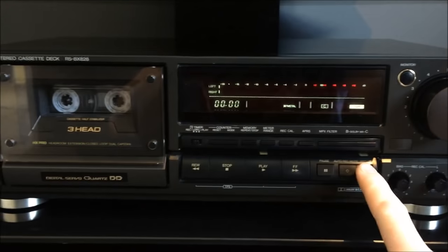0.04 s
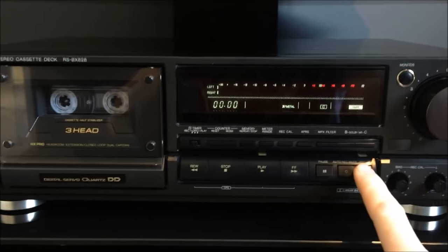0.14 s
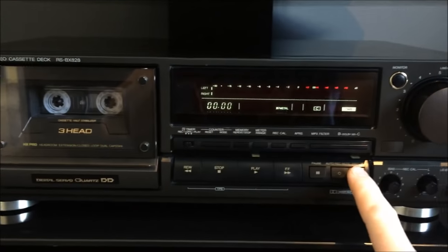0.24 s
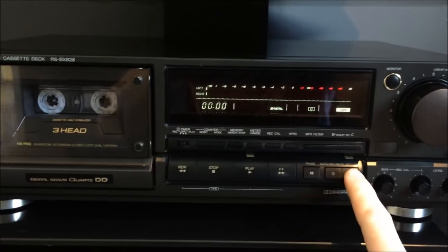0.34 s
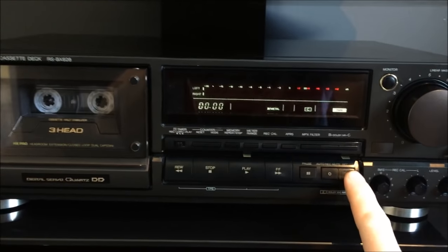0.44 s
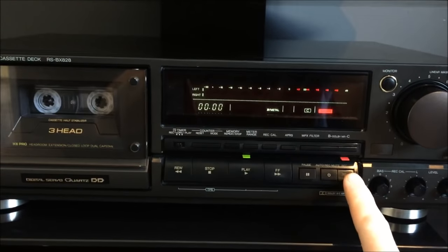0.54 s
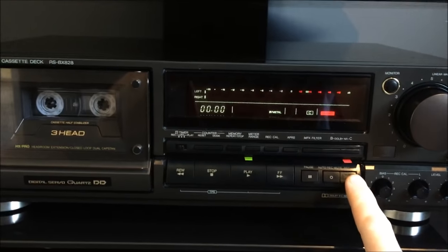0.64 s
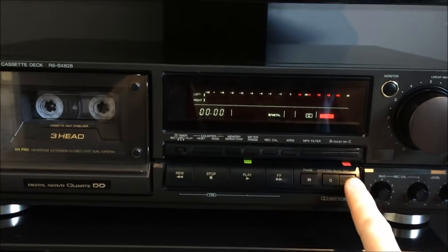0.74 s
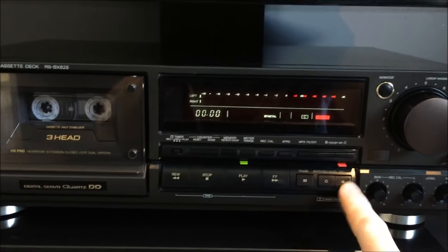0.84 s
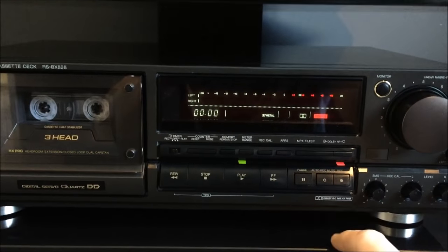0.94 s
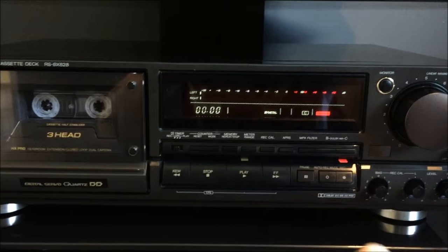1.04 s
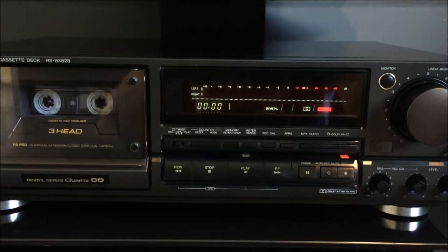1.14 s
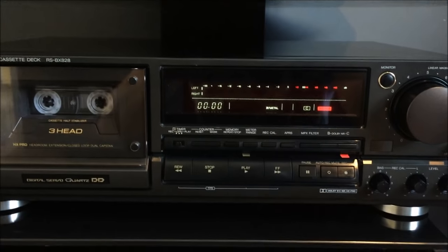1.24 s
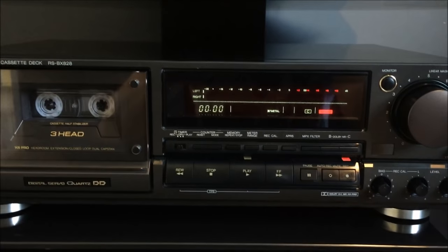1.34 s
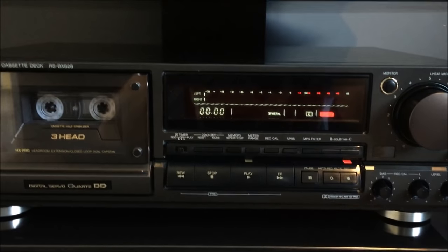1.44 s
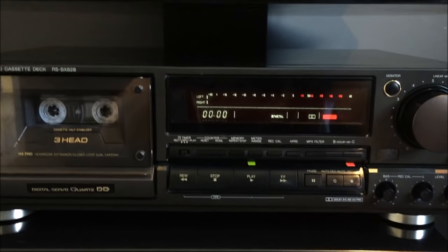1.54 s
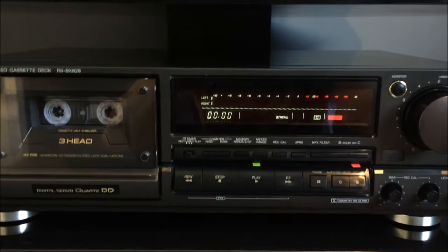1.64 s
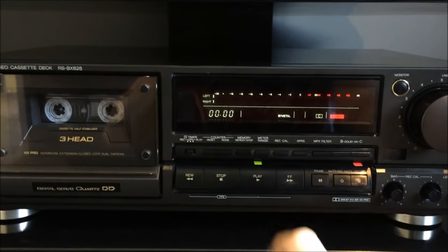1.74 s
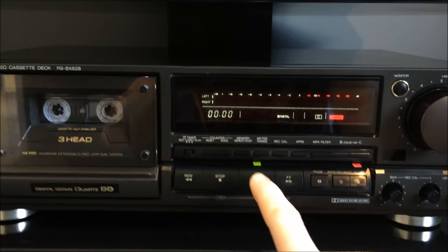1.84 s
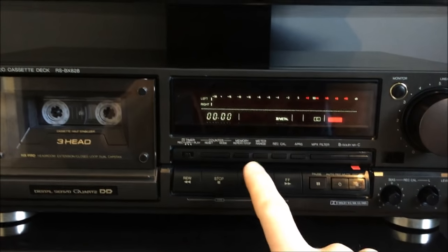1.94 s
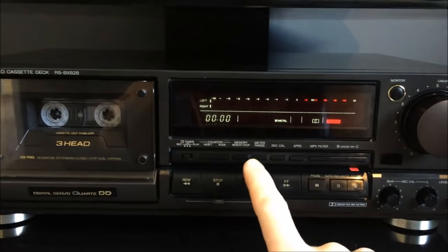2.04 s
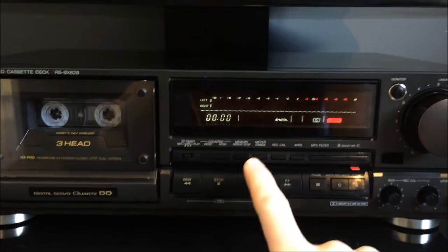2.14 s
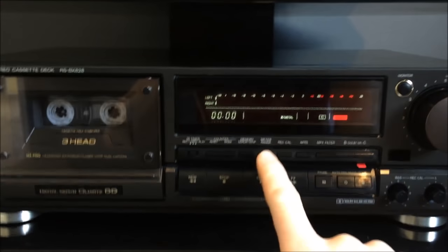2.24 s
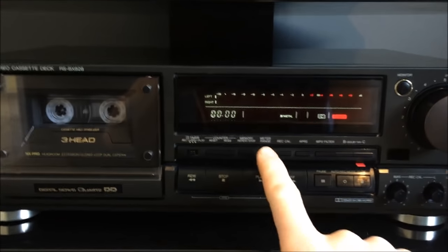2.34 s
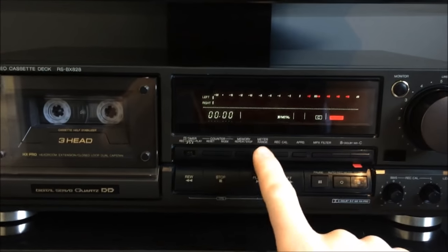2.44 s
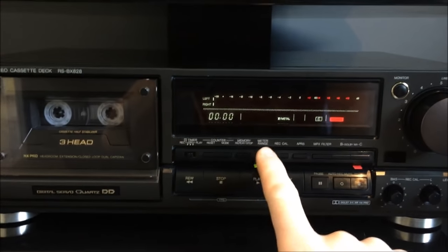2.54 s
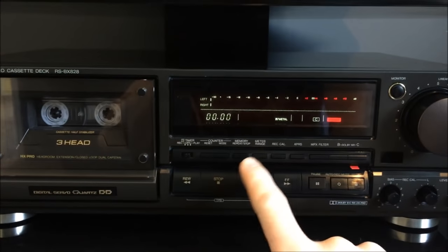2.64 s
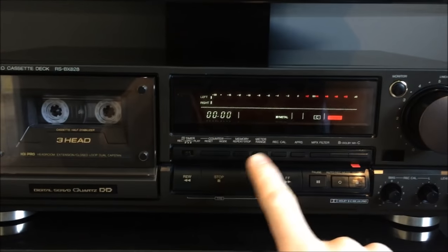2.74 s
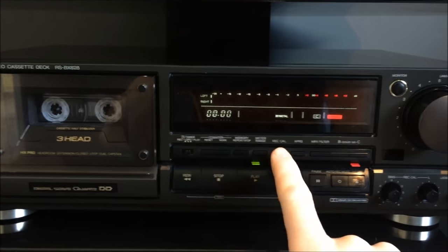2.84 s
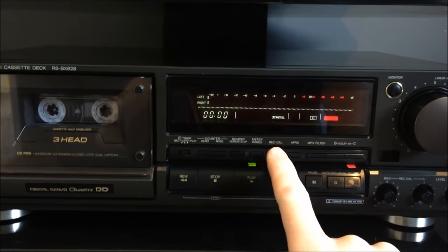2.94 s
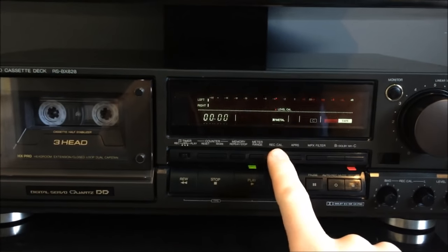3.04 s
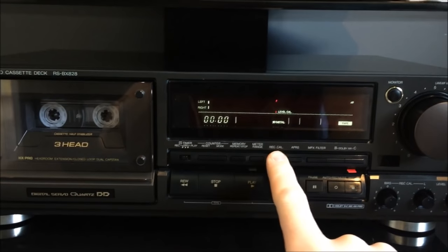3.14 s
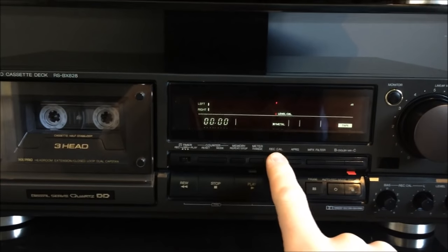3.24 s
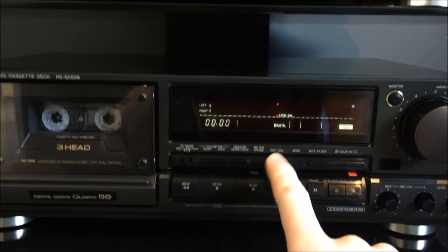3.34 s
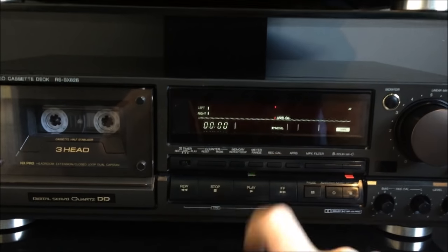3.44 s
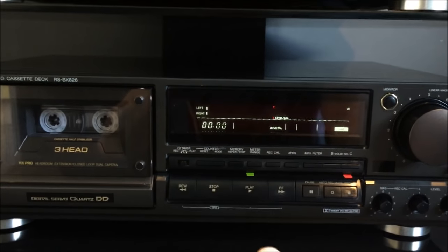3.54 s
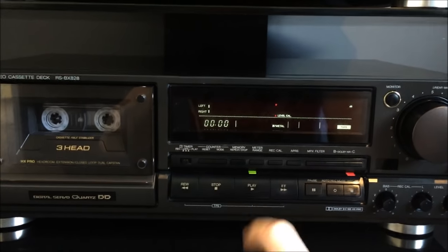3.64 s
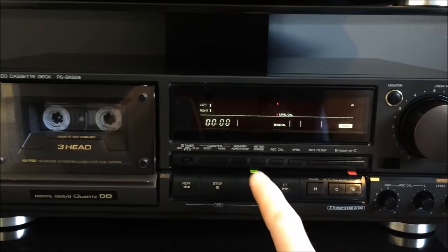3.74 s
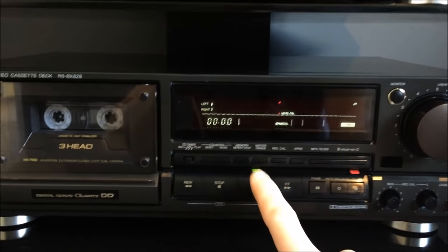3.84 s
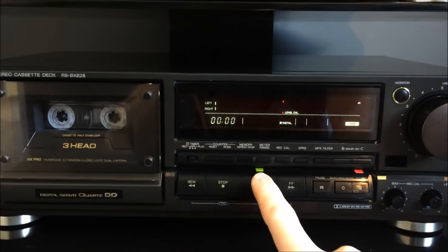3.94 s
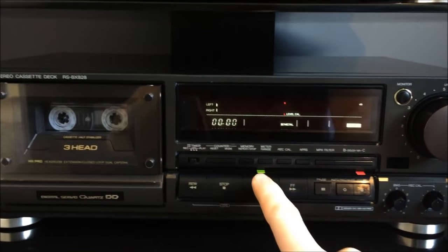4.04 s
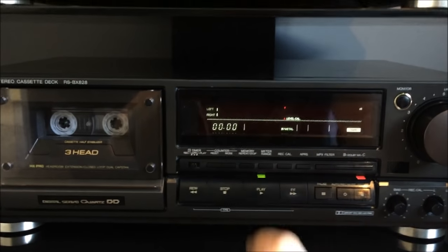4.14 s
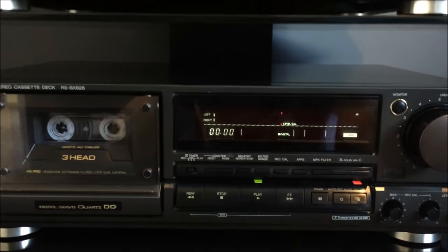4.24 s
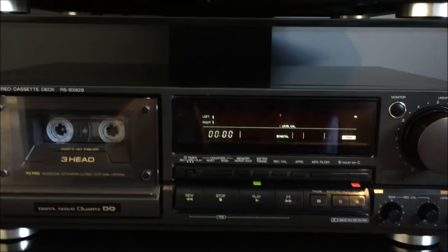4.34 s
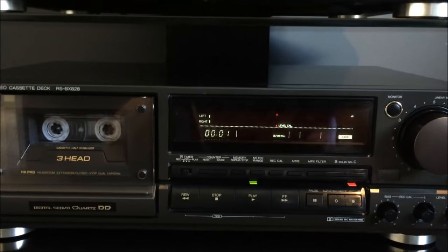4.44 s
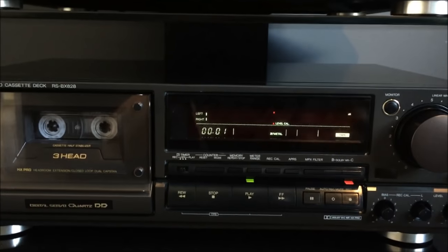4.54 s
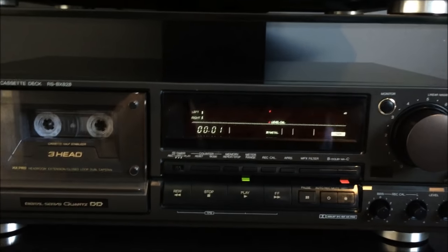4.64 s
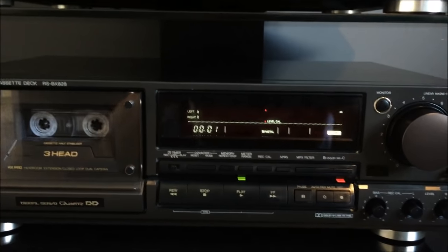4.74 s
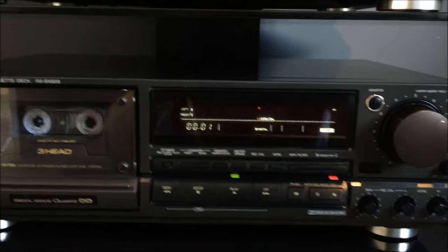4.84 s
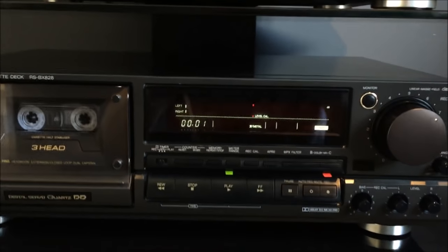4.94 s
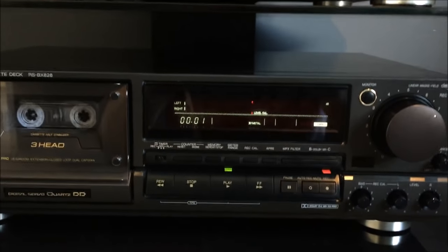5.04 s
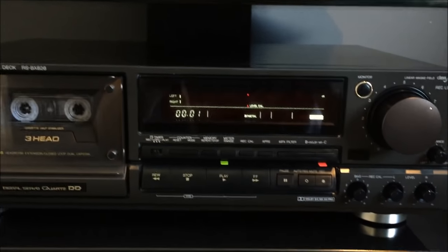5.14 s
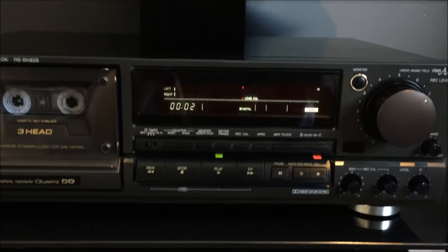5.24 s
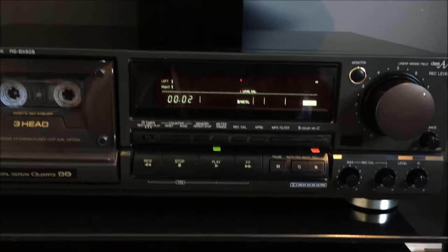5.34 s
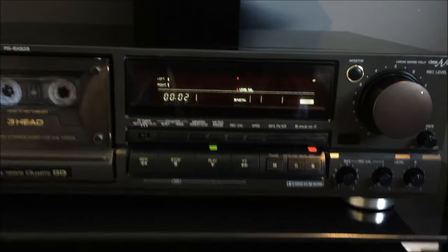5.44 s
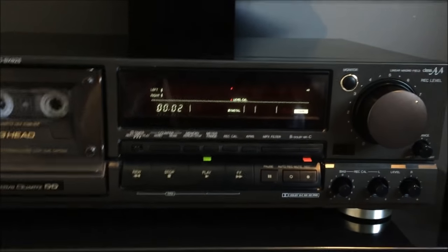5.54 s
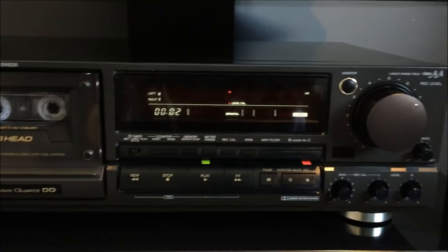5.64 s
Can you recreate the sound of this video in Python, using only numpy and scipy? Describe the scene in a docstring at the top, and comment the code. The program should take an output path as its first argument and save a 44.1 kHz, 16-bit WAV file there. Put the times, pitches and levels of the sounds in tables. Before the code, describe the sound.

Soft-touch tape deck buttons heard up close indoors: a bright plastic click, a harder latch clack, quiet panel touches, a small double click, then play. The transport answers with rapid clacks, a half-second of low gear rattle and a firm head-carriage clunk. Low damped bumps from the hand on the microphone occur throughout, the strongest and creakiest at the end, above faint hum and hiss.

```python
"""The soft-touch keys of a cassette deck click down and spring back under a finger in a small, quiet room:
bursts of chatter ring the plastic part, then the case, then the room.
A latch, a solenoid and levers clack the head carriage into place, as a cam motor rattles its gears.
The hand that holds the microphone bumps it: damped thumps with creaks and a slower sway.
Faint squeaks, tape whisper, wavering hum lines and shaped noise lie underneath."""
import sys
import numpy as np
from scipy import signal
from scipy.fft import rfft, irfft, next_fast_len
from scipy.io import wavfile
from scipy.ndimage import uniform_filter1d

SR = 44100
rng = np.random.default_rng(int(sys.argv[2]) if len(sys.argv) > 2 else 0)


def materialize(psi):
    """Save the field psi as 16-bit PCM at rate SR to the path in sys.argv[1].

    A 1-D psi becomes a single channel; in a 2-D psi each row is a channel.
    """
    bounded = np.clip(np.atleast_2d(psi).T, -1, 1)
    quanta = np.round(bounded * 32767).astype(np.int16)
    wavfile.write(sys.argv[1], SR, quanta)


N = 250703
BLOW_SIZE = 16384
TIME = np.arange(N) / SR
AGE = TIME[:BLOW_SIZE]

# Strikes of the tape transport. Each row: start in seconds, part, relative level in dB, treble in dB,
# seating level in dB against the strike.
TRANSPORT_CLACKS = [(1.0014, "latch", 8, -2.5, -8), (4.034, "solenoid", 0.5, 11, 7),
                    (4.0939, "solenoid", 0.5, 4.5, -5.5), (4.161, "lever", -4.5, -2, -3),
                    (4.3586, "lever", -11, 6.5, 3), (4.411, "lever", -16, -3.5, -23),
                    (4.435, "lever", -12.5, -6, -7), (4.4525, "head carriage", 4, 6, -5)]


def from_db(db):
    """Decibels to gain."""
    return 10 ** (np.asarray(db) / 20)


def rms_one(x):
    """Scale to an rms of one."""
    return x / np.sqrt(np.mean(x ** 2) + 1e-20)


def energy_one(x):
    """Scale to the energy of a unit click."""
    return x / np.sqrt(np.sum(x ** 2) + 1e-20)


def at_hz(points, hz):
    """Interpolate (Hz, value) points on a log-frequency axis."""
    points = np.array(points)
    return np.interp(np.log(np.maximum(hz, 1)), np.log(points[:, 0]), points[:, 1])


def add(out, start_s, sound):
    """Mix a sound in from a given time."""
    start = int(round(start_s * SR))
    out[start:start + len(sound)] += sound[:N - start]


def causal(x, gain):
    """Minimum-phase filter with a given gain per bin: nothing sounds early."""
    cepstrum = irfft(np.log(gain + 1e-9))
    size = len(cepstrum)
    # fold the cepstrum onto positive time
    cepstrum[1:size // 2] *= 2
    cepstrum[size // 2 + 1:] = 0
    response = np.exp(rfft(cepstrum))
    return irfft(rfft(x, size) * response)[:len(x)]


def coloured(x, *spectra):
    """Minimum-phase filter through the sum of (Hz, dB) curves."""
    hz = np.fft.rfftfreq(2 * next_fast_len(len(x) // 2 + 1), 1 / SR)
    total_db = sum(at_hz(points, hz) for points in spectra)
    return causal(x, from_db(total_db))


def resonate(x, hz, width_hz):
    """Two-pole resonance with a gain of one on top."""
    r = np.exp(-np.pi * width_hz / SR)
    numerator = np.array([1, 0, -1]) * (1 - r * r) / 2
    denominator = [1, -2 * r * np.cos(2 * np.pi * hz / SR), r * r]
    return signal.lfilter(numerator, denominator, x)


def key_blows(bass_db=-3, middle_db=-4, thinning=2.3, room_db=-6.0,
              stop_bass_db=2, stop_middle_db=6, stop_treble_db=-9, stop_room_db=-12):
    """A key snaps down or springs back, the thinner the brighter, then hits its stop with a duller tap."""
    # Each row: start in seconds, part, relative level in dB, brightness in dB, stop in dB against the snap.
    buttons = [(0.6407, "record key", 6, 0, -14), (3.1619, "small key", -3, -4.5, -15.5),
               (3.2435, "small key", -15.5, 12.5, -6.5), (4.0086, "play key", -1.5, 0.5, -2.5)]
    snap_ms, stop_ms, travel_ms = 1.69, 3.8, 5.0
    rows = []
    for start_s, part, level_db, bright_db, stop_db in buttons:
        snap_bass_db = bass_db - thinning * bright_db
        rows.append((start_s, part, snap_ms, level_db, snap_bass_db, middle_db, bright_db, room_db))
        rows.append((start_s + travel_ms / 1000, part, stop_ms, level_db + stop_db,
                     stop_bass_db, stop_middle_db, stop_treble_db, stop_room_db))
    return rows


def panel_blows(treble_db=-6, treble_share=0.64, room_db=-5):
    """Soft panel knocks, by finger or mechanism; the duller, the more body and the less treble."""
    # Each row: start in seconds, contact time in ms, relative level in dB, dullness in dB, bass in dB.
    knocks = [(.9545, 14, -20, 18.5, -1), (.975, 15, -21, 3, 21.5), (1.136, 11, -20.5, -6.5, 2),
              (1.682, 5.9, -27.5, 4.5, 18), (2.564, 3.9, -28, 9.5, 13), (2.585, 7.6, -34, 14.5, 26),
              (3.4385, 5.5, -21.5, 8.5, 20), (4.003, 2.6, -15, -1, 3)]
    rows = []
    for start_s, contact_ms, level_db, dull_db, bass_db in knocks:
        knock_treble_db = treble_db - treble_share * dull_db
        rows.append((start_s, "front panel", contact_ms, level_db, bass_db, dull_db, knock_treble_db, room_db))
    return rows


def transport_blows(bass_db=3, middle_db=3.0, thinning=0.95, room_db=-5.5, seat_ms=5.17,
                    seat_bass_db=6, seat_middle_db=4, seat_treble_db=-14, seat_room_db=-6):
    """Harder strikes are shorter and thinner; each is followed by a dull clunk as the part seats."""
    # contact time at 0 dB, level rise that halves it, delay until the part seats
    strike_ms, halving_db, seating_ms = 6.36, 39, 6.5
    rows = []
    for start_s, part, level_db, treble_db, seat_db in TRANSPORT_CLACKS:
        contact_ms = strike_ms * .5 ** (level_db / halving_db)
        strike_bass_db = bass_db - thinning * level_db
        rows.append((start_s, part, contact_ms, level_db, strike_bass_db, middle_db, treble_db, room_db))
        rows.append((start_s + seating_ms / 1000, part, seat_ms, level_db + seat_db,
                     seat_bass_db, seat_middle_db, seat_treble_db, seat_room_db))
    return rows


def chatter(contact_ms, rise_share, evenness=0.73):
    """Parts chatter as they meet: a brief, dying noise burst with a fairly even spectrum."""
    age = AGE / (contact_ms / 1000)
    envelope = (1 - np.exp(-age / rise_share)) * np.exp(-np.minimum(age, 40))
    burst = rng.standard_normal(BLOW_SIZE) * envelope
    power = uniform_filter1d(np.abs(rfft(energy_one(burst))) ** 2, size=15)
    return energy_one(causal(burst, (power + 1e-4) ** (-evenness / 2)))


def part_gain(modes, mount_width_hz, loss):
    """Gain per bin of a part's modes, damped by its mounting and, ever more in the treble, by its material."""
    hz, power = np.fft.rfftfreq(BLOW_SIZE, 1 / SR), 1
    for centre_hz, db in modes:
        width_hz = mount_width_hz + loss * centre_hz * (1 + centre_hz / 8000)
        power = power + from_db(db) ** 2 / (1 + (2 * (hz - centre_hz) / width_hz) ** 2)
    return np.sqrt(power)


def room_response(build_s=0.0021):
    """Diffuse reflections build up and die away at a rate set per band."""
    # Each row: frequency in Hz, t60 in seconds, relative level in dB.
    room = np.array([(100, 0.41, 10.5), (298, 0.2, 3.5), (700, 0.2, 12.5), (2160, 0.19, -5.5),
                     (4960, 0.16, 4), (8900, 0.13, -4.5), (14000, 0.33, -23)])
    t60_s, level_db = room[:, :2], room[:, ::2]
    out, edges_hz = 0, np.geomspace(60, 18000, 10)
    for low_hz, high_hz in zip(edges_hz, edges_hz[1:]):
        hz = np.sqrt(low_hz * high_hz)
        band_filter = signal.butter(2, [low_hz, high_hz], "band", fs=SR, output="sos")
        band = signal.sosfilt(band_filter, rng.standard_normal(BLOW_SIZE))
        decay = np.exp(-np.log(1000) * AGE / at_hz(t60_s, hz))
        out = out + from_db(at_hz(level_db, hz)) * band * decay
    return energy_one(out * (1 - np.exp(-(AGE / build_s) ** 2)))


def blows(table, colour, mount_width_hz, loss, case_db, wet_db, rise_share):
    """Each blow rings the part that is hit, the whole case and the room."""
    # Modes by part. Each row: frequency in Hz, level in dB above the part's broad colour.
    part_modes = {"record key": [(732, -12), (1110, 10), (1470, 3.5), (1840, 4), (2020, 8.5), (2330, 2),
                  (2600, 1.5), (3150, -13), (3700, 3), (5400, 0), (7020, 5.5), (8780, 10)],
                  "small key": [(431, 13), (1200, 5), (1700, 10), (2100, 16), (2220, 1), (2500, 14),
                  (2730, 10), (3100, 10), (3380, 8.5), (3900, 6), (6550, 16.5), (9900, 17), (11000, 21),
                  (12900, 20.5)], "play key": [(440, 25), (554, 15.5), (745, 20), (1050, 15), (1450, 16),
                  (2140, 13), (2750, 7), (3700, -4), (5700, 8), (8900, 10), (13500, 2)],
                  "front panel": [(210, 17), (460, 10.5), (735, 11.5), (1070, -2), (1660, 1), (1850, 6.5),
                  (2080, 0.5), (2520, -6), (3200, 1)], "latch": [(368, 18), (425, 10), (745, 9),
                  (1130, -0.5), (1400, 9.5), (1640, -25), (2130, 8), (2650, 9.5), (3020, 6), (3670, 9.5),
                  (4250, 3), (5900, 8.5), (8700, 16), (9740, 13)], "solenoid": [(372, 14.5), (435, -5),
                  (750, 6), (1060, 0), (1260, -3), (1620, 10), (1820, 5), (2300, 7), (2700, -4),
                  (5100, 4.5), (7900, 0), (10700, -1), (12400, 6.5)], "lever": [(1070, 14.5), (1290, 11.5),
                  (1690, -5), (2050, 10.5), (2420, 10), (2680, -17), (3500, -10), (4750, -9), (6700, 4.5)],
                  "head carriage": [(310, 22.5), (565, 16), (720, 10), (1020, -8), (1400, 3), (1760, 9.5),
                  (2000, 11.5), (2330, 10), (2750, 5.5), (3700, -2), (4764, 5), (5870, 9.5), (8980, 8),
                  (10500, -5), (13300, 10)]}
    # Modes of the deck's case. Each row: frequency in Hz, relative level in dB, t60 in seconds.
    case_modes = [(305, -5, 0.46), (327, 6.5, 0.37), (395, 6.5, 0.39), (570, 5.5, 0.25), (713, 8.5, 0.22),
                  (752.5, 8, 0.098), (880, 2.5, 0.11), (1018, 1.5, 0.082), (1234, 2, 0.13),
                  (1360, 1, 0.076), (1650, 6.5, 0.14), (1780, -8, 0.39), (1812, 2.5, 0.094),
                  (2194, 2.5, 0.15), (2447, -7, 0.042), (2620, 5.5, 0.13), (2660, -10, .15),
                  (3600, -8, 0.047)]
    out = np.zeros(N)
    for start_s, part, contact_ms, level_db, bass_db, middle_db, treble_db, room_db in table:
        tone = [(300, bass_db), (850, middle_db), (2200, 0), (9000, treble_db)]  # Hz, dB
        knock = coloured(chatter(contact_ms, rise_share), colour, tone)
        direct = causal(knock, part_gain(part_modes[part], mount_width_hz, loss))
        case = sum(from_db(db) * resonate(knock, hz, np.log(1000) / np.pi / t60_s)
                   for hz, db, t60_s in case_modes)
        room = signal.fftconvolve(direct, room_response())[:BLOW_SIZE]
        blow = direct + from_db(case_db) * case + from_db(wet_db + room_db) * room
        add(out, start_s, from_db(level_db) * blow)
    return out


def cam_effort():
    """The motor starts, labours under each load and runs down when switched off; as a gain."""
    # The cam takes up a load, then eases. Each row: start in seconds, surge in dB, easing time in seconds.
    loads = [(4.024, 28.5, 0.097), (4.175, 13.5, 0.15)]
    on_s, off_s, free_running_db, attack_s, run_down_db_per_s = 4.02, 4.55, -59, 0.017, 170

    def since(start_s):
        """Seconds after a moment, zero before it."""
        return np.maximum(TIME - start_s, 0)

    def taken_up(start_s):
        """Smooth rise from zero to one."""
        return 1 - np.exp(-(since(start_s) / attack_s) ** 2)

    surge_db = sum(db * taken_up(start_s) * np.exp(-since(start_s) / easing_s)
                   for start_s, db, easing_s in loads)
    return taken_up(on_s) * from_db(free_running_db + surge_db - run_down_db_per_s * since(off_s))


def cam_motor(rattles_per_s=2200):
    """Gear teeth, as random clicks, rattle the chassis resonances while the cam lifts the heads."""
    # Each row: frequency in Hz, width in Hz, relative level in dB.
    gear_resonances = [(95, 26, -5.5), (149.6, 15, 3.5), (187.7, 20, 6), (287, 18, 3), (343.4, 5.8, 7.5),
                       (450, 64, -13), (570, 30, -10.5), (702, 17, -6), (1530, 870, -20.5),
                       (2630, 990, -29.5)]
    teeth = (rng.random(N) < rattles_per_s / SR) * rng.standard_normal(N) + 1e-18
    chassis = np.zeros(N)
    for k, (hz, width_hz, db) in enumerate(gear_resonances):
        chassis += (-1) ** k * from_db(db) * resonate(teeth, hz, width_hz)  # alternate polarity
    return cam_effort() * rms_one(chassis)


def thump(hz, damping=0.71, softness=3.0):
    """One heavily damped swing of the microphone housing; soft skin keeps out all above a few times its pitch."""
    skin = signal.butter(4, softness * hz, fs=SR, output="sos")
    push = signal.sosfilt(skin, signal.unit_impulse(BLOW_SIZE) + 1e-18)
    return resonate(resonate(push, hz, damping * hz), hz, 2 * damping * hz)


def creak(contact_ms):
    """Skin and plastic rub briefly: coloured chatter."""
    # Each row: frequency in Hz, level in dB.
    creak_colour = [(100, 0.5), (450, -6), (800, 7), (1200, -1), (2500, -6.5), (4500, -18), (8000, -23.5),
                    (15500, -30)]
    return coloured(chatter(contact_ms, rise_share=0.63), creak_colour)


def bumps(creak_ms=2.5, lowest_hz=42, rumble_hz=110, rumble_db=8):
    """Hand knocks thump the housing, the firmer the creakier, and it sways slower; the slipping grip rubs."""
    # Firmer contact, higher thump. Each row: start in seconds, relative level in dB, thump in Hz.
    knocks = [(.460, -3.5, 145), (1.462, -2.5, 78), (1.785, -4, 76), (2.813, 0.5, 263), (5.193, -2.5, 65.4),
              (5.382, -1, 211), (5.525, -12, 768), (5.574, 5.5, 415), (5.596, 12, 202)]
    # The grip slips. Each row: start in seconds, length in ms, relative level in dB.
    slips = [(5.538, 28, -15.5), (5.590, 5.1, -6.5)]
    # creak level against a 0 dB thump of firm_hz, and its rise with the thump's pitch and level
    firm_hz, firm_creak_db, creak_db_per_octave, creak_db_per_db = 430, -13.5, 26.5, 0.68
    # sway: share of the thump's pitch, level after a 0 dB thump, growth with the thump's level
    sway_share, sway_db, sway_db_per_db = .28, 0, 1.65
    out = np.zeros(N)
    for start_s, level_db, hz in knocks:
        creak_db = firm_creak_db + creak_db_per_octave * np.log2(hz / firm_hz) + creak_db_per_db * level_db
        sway_hz = sway_share * hz
        picked_up = 1 / (1 + (lowest_hz / sway_hz) ** 6)  # too low a sway is lost
        sway = from_db(sway_db + sway_db_per_db * level_db) * picked_up * thump(sway_hz)
        contact = thump(hz) + from_db(creak_db) * creak(creak_ms)
        add(out, start_s, from_db(level_db) * contact + sway)
    for start_s, length_ms, level_db in slips:
        rub = creak(length_ms)
        rumble = from_db(rumble_db) * resonate(rub, rumble_hz, rumble_hz)
        add(out, start_s, from_db(level_db) * (rub + rumble))
    return out


def squeaks(width_hz=220, length_s=0.0066):
    """Tiny, soft-edged high chirps: narrow-band noise in Gaussian windows."""
    # Each row: centre in seconds, level in dB, pitch in Hz.
    chirps = [(2.147, -71, 4350), (2.53, -72, 4720), (3.43, -69, 4370), (3.705, -74, 4400),
              (5.48, -66, 2000)]
    noise, out = rng.standard_normal(N), 0
    for centre_s, db, hz in chirps:
        window = np.exp(-((TIME - centre_s) / length_s) ** 2)
        narrow = resonate(resonate(noise, hz, width_hz), hz, width_hz)
        out = out + from_db(db) * window * rms_one(narrow)
    return out


def running_tape(hz=2160, width_hz=130, level_db=-81):
    """Once the heads are in, the tape rubs past them with a faint whisper of narrow-band noise."""
    heads_in = TIME > TRANSPORT_CLACKS[-1][0]
    return from_db(level_db) * heads_in * rms_one(resonate(rng.standard_normal(N), hz, width_hz))


def background(waver=0.35, waver_width_hz=9, air_db=-67.5):
    """Slightly wavering hum lines of motors and room over low rumble and hiss."""
    # Each row: frequency in Hz, rms of the steady line in dB.
    hum = [(70, -79), (100, -81.5), (199.5, -81.5), (329, -76.5)]
    # Colour of the room noise. Each row: frequency in Hz, relative level in dB.
    room_tone = [(15, -30), (25, -16), (64, -1), (166, -11.5), (270, -15.5), (301, -13.5), (326, -9.5),
                 (394, -19), (439, -18.5), (754, -21.5), (936, -22), (1230, -23.5), (1840, -22.5),
                 (13200, -34), (16000, -37.5)]
    out = from_db(air_db) * rms_one(coloured(rng.standard_normal(N), room_tone))
    for hz, db in hum:
        line = np.sqrt(2) * np.sin(2 * np.pi * (hz * TIME + rng.random()))
        wavering = waver * rms_one(resonate(rng.standard_normal(N), hz, waver_width_hz))
        out += from_db(db) * (line + wavering)
    return out


def scene():
    """Keys, transport, handling and hum at one close microphone."""
    # Colours of a blow. Each row: frequency in Hz, level in dB.
    key_colour = [(80, -30.5), (300, -17.5), (560, -18.5), (760, -7), (1400, -4.5), (2100, 1), (3000, -3.5),
                  (4500, -14), (7000, -20.5), (9500, -24.5), (12000, -27.5), (15500, -29.5)]
    transport_colour = [(80, -31), (200, -10.5), (380, -6.5), (480, -7.5), (750, -9.5), (1200, -1.5),
                        (1700, 1.5), (2600, -0.5), (3800, -3.5), (5500, -9), (9300, -11), (11500, -11.5),
                        (15500, -17)]
    # Damping: mode width from the mounting in Hz, loss factor.
    plastic_damping = (24, 0.031)
    metal_damping = (5.2, 0.021)
    keys = from_db(-2.0) * blows(key_blows() + panel_blows(), key_colour, *plastic_damping,
                                 case_db=4, wet_db=-3.5, rise_share=0.53)
    transport = from_db(-4.0) * blows(transport_blows(), transport_colour, *metal_damping,
                                      case_db=5.5, wet_db=-2.5, rise_share=0.43)
    mix = keys + transport + cam_motor() + bumps() + squeaks() + running_tape() + background()
    return mix[None]


def record(dry):
    """A steep elliptic low-pass cuts the top."""
    cutoff_hz, ripple_db, stop_db = 16000, .2, 70
    return signal.sosfilt(signal.ellip(10, ripple_db, stop_db, cutoff_hz, fs=SR, output="sos"), dry)


dry = scene()
out = record(dry)
materialize(out)
```